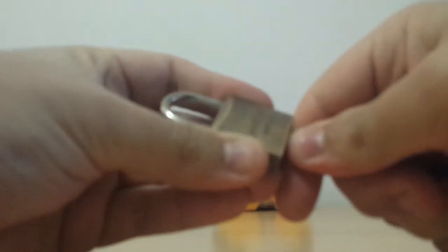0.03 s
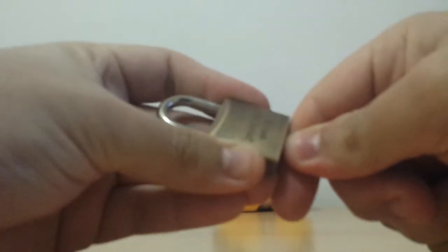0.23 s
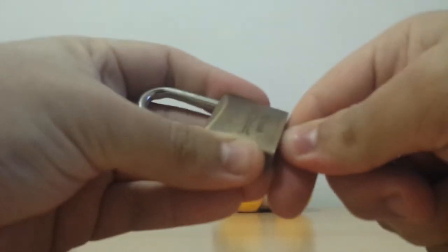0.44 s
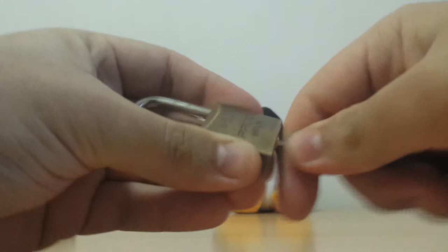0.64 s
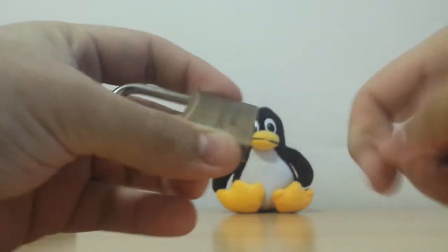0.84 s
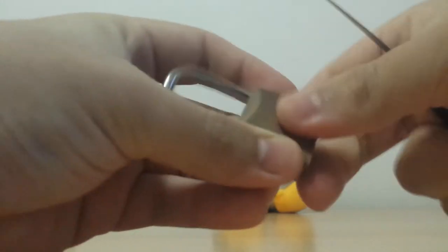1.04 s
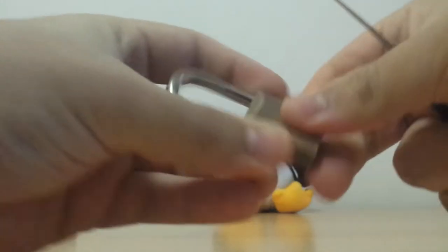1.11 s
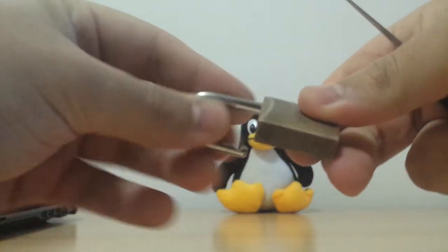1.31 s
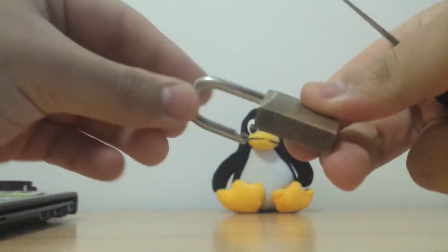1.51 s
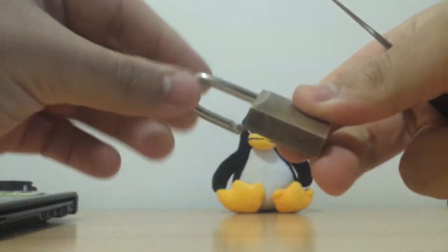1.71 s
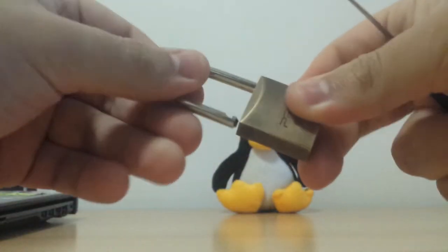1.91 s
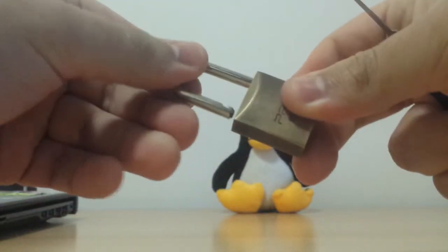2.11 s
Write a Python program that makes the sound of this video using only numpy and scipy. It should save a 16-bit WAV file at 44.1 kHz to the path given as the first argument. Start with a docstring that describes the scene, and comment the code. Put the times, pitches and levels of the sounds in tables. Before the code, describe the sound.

A small metal padlock clicks under a pick, then snaps open with a thin, high ring. Fingers rub softly, and the pick slides out with a quick rattling scrape, heard up close in a quiet room with faint fan noise.

```python
"""A pin clicks over a faint fan hum: a small brass padlock is being picked, close up, in a quiet room.
The sprung shackle snaps against its stop, buzzes in its bore and rings. The pick then rattles over the
pins and scrapes out of the keyway, while fingers rub the lock and the hands take the jolts.
The recorder's gain control ducks at the snap, holds and slowly recovers."""
import sys
import numpy as np
from scipy import signal
from scipy.fft import rfft, irfft, next_fast_len
from scipy.io import wavfile
from scipy.ndimage import uniform_filter1d, minimum_filter1d

SR = 44100
rng = np.random.default_rng(int(sys.argv[2]) if len(sys.argv) > 2 else 0)


def output_pcm(signal):
    """Save a mono or channel-first signal as 16-bit PCM at the path in sys.argv[1].

    Samples are clipped to [-1, 1] before scaling.
    """
    pcm = np.clip(np.atleast_2d(signal).T, -1, 1) * 32767
    wavfile.write(sys.argv[1], SR, np.round(pcm).astype(np.int16))


N = 94815
TIME_S = np.arange(N) / SR
N_FFT = 2 * next_fast_len(N)


def from_db(db):
    """Decibels to gain."""
    return 10 ** (np.asarray(db) / 20)


def unit_rms(x):
    """Scale to unit rms."""
    return x / np.sqrt(np.mean(x ** 2) + 1e-20)


def per_bin(points):
    """Interpolate (frequency, value) points over log frequency at every FFT bin."""
    hz, value = np.transpose(points)
    bins_hz = np.fft.rfftfreq(N_FFT, 1 / SR)
    return np.interp(np.log(bins_hz + 1e-9), np.log(hz), value)


def colour(x, gain_db):
    """Minimum-phase filter with the given gain per bin."""
    cepstrum = irfft(gain_db * np.log(10) / 20)
    size = len(cepstrum)
    cepstrum[1:size // 2] *= 2
    cepstrum[size // 2 + 1:] = 0
    return irfft(rfft(x, size) * np.exp(rfft(cepstrum)))[..., :N]


def delayed(x, lag_s):
    """Delay to the nearest sample."""
    return np.interp(np.arange(N) - np.round(lag_s * SR), np.arange(N), x, left=0)


def decay(start_s, decay_s):
    """Sudden start, exponential fall."""
    return (TIME_S >= start_s) * np.exp(-np.maximum(TIME_S - start_s, 0) / decay_s)


def contact(start_s, decay_s, lumpiness=1):
    """Dying burst of tiny impacts, unit energy; lower lumpiness gives a flatter spectrum."""
    burst = unit_rms(rng.choice([-1, 1], N) * decay(start_s, decay_s)) / np.sqrt(N)
    power = np.abs(rfft(burst, N_FFT)) ** 2
    flattened = colour(burst, -10 * np.log10(power + lumpiness))
    return unit_rms(flattened) / np.sqrt(N)


# Fan air noise (frequency [Hz], relative density [dB])
AIR_SPECTRUM = [(25, -12), (60, -5.5), (100, 1.5), (160, -8.5), (280, -6.5), (400, -9.5), (560, -6.5),
                (780, -3), (1000, -11), (1400, -10.5), (2500, -15.5), (4400, -20.5), (8000, -20.5),
                (14000, -26.5)]
# Air noise between channels (frequency [Hz], likeness before clipping [-])
AIR_LIKENESS = [(60, 0.75), (180, 0.74), (550, 0.15), (1650, -1.5), (4970, -0.0), (15000, 0.11)]
# Fan tones (frequency [Hz], level before trim [dB])
FAN_TONES = [(220.7, -86.5), (285.3, -82), (355.3, -77.5), (489.9, -85.5), (532.9, -78.5), (619.1, -77),
             (710.6, -83.5)]


def fan(air_db=-64, mains_hz=100, mains_db=-75, tone_trim_db=1.5, tone_width_hz=5, left_lag_s=.00023):
    """Soft air noise, mains hum and wavering low tones, off to the right."""
    likeness = np.clip(per_bin(AIR_LIKENESS), 0, .95)
    mid = colour(rng.standard_normal(N), per_bin(AIR_SPECTRUM) + 10 * np.log10(1 + likeness))
    side = colour(rng.standard_normal(N), per_bin(AIR_SPECTRUM) + 10 * np.log10(1 - likeness))
    left, right = from_db(air_db) * unit_rms(np.array([mid + side, mid - side]))
    hum = from_db(mains_db) * unit_rms(np.sin(2 * np.pi * mains_hz * TIME_S))
    radius = np.exp(-np.pi * tone_width_hz / SR)
    for hz, db in FAN_TONES:
        resonator = [1, -2 * radius * np.cos(2 * np.pi * hz / SR), radius ** 2]
        tone = signal.lfilter([1, 0, -1], resonator, rng.standard_normal(N + SR))[SR:]
        hum += from_db(db + tone_trim_db) * unit_rms(tone)
    return np.array([delayed(left + hum, left_lag_s), right + hum])


# Room reverberation (band centre [Hz], T60 [s], relative level [dB])
ROOM_BANDS = [(149.8, .7, 4.5), (600, .6, -3), (2480, 0.38, 4.5), (3900, .42, 1.5), (5860, 0.31, -0.5),
              (7500, .35, 2.5), (9900, 0.31, 0.5), (13170, 0.25, -1)]


def room(x, build_s=.0036):
    """Diffuse tail, different at each microphone port; the treble dies first."""
    white = rfft(rng.standard_normal((2, N)), N_FFT)
    tail = np.zeros((2, N))
    for centre_hz, t60_s, db in ROOM_BANDS:
        passband = per_bin([(hz, float(hz == centre_hz)) for hz, *_ in ROOM_BANDS])
        band = irfft(white * passband)[:, :N]
        tail += from_db(db) * band * decay(0, t60_s / np.log(1000))
    tail *= 1 - np.exp(-(TIME_S / build_s) ** 2)
    return signal.fftconvolve(x[None], unit_rms(tail) / np.sqrt(N), axes=1)[:, :N]


def wall_echo(x, lag_s=.0112, decay_s=.0012):
    """One scattered reflection off the wall behind the desk."""
    return np.array([signal.fftconvolve(x, contact(lag_s, decay_s))[:N] for port in "LR"])


# Grip shifts (centre time [s], half length [s], level [dB])
GRIP_SHIFTS = [(0.29, 0.072, -69), (0.47, 0.16, -59), (1.8, 0.048, -73.5)]
# Skin friction (frequency [Hz], relative level [dB])
SKIN_SPECTRUM = [(40, -6), (80, 3.5), (200, -3), (400, 0.5), (800, -2), (1500, -13.5), (4000, -17),
                 (12000, -27)]


def fingers():
    """Skin rubs softly on the lock."""
    grip = sum(from_db(db) * np.exp(-((TIME_S - at_s) / half_s) ** 2) for at_s, half_s, db in GRIP_SHIFTS)
    return grip * unit_rms(colour(rng.standard_normal(N), per_bin(SKIN_SPECTRUM)))


# Hand jolts (time [s], decay [s], level before pan [dB])
JOLTS = [(0.245, 0.028, -65.5), (0.351, 0.03, -45.5), (0.688, 0.029, -52)]


def hand_thumps(band_hz=(45, 150), width=.7, pan_right_db=4.5):
    """Dull thumps as the hands take each jolt."""
    bandpass = signal.butter(2, band_hz, "band", fs=SR, output="sos")
    mid, side = unit_rms(signal.sosfilt(bandpass, rng.standard_normal((2, N))))
    rumble = np.array([mid + width * side, mid - width * side])
    envelope = sum(from_db(db) * decay(at_s, decay_s) for at_s, decay_s, db in JOLTS)
    return rumble * envelope * from_db([[-pan_right_db], [pan_right_db]])


# Sliding pick resonances (frequency [Hz], relative level [dB])
PICK_SPECTRUM = [(300, -11.5), (1500, -20), (2650, -7.5), (3100, 2), (3500, 9), (4050, -6.5), (4600, 1),
                 (5800, 8.5), (7000, 6), (8100, 6.5), (9200, -3.5), (14000, -7)]


def pick_scrape(start_s=.708, attack_s=.048, end_s=.7893, release_s=.0085, level_db=-39):
    """Uneven slips excite the sliding pick until it leaves the keyway."""
    slips_per_s, spread_db = 2300, 2.5
    sizes = from_db(spread_db * np.minimum(rng.exponential(1, N), 4)) * rng.choice([-1, 1], N)
    slips = (rng.random(N) < slips_per_s / SR) * sizes
    attack = np.clip((TIME_S - start_s) / attack_s, 0, 1)
    release = np.exp(-np.maximum(TIME_S - end_s, 0) / release_s)
    return from_db(level_db) * attack * release * unit_rms(colour(slips, per_bin(PICK_SPECTRUM)))


def ring(start_s, modes):
    """Struck metal: damped modes, neighbours in opposite phase."""
    ringing = np.zeros(N)
    for k, (hz, db, t60_s) in enumerate(modes):
        envelope = from_db(db) * decay(start_s, t60_s / np.log(1000))
        ringing += (-1) ** k * envelope * np.cos(2 * np.pi * hz * (TIME_S - start_s))
    return ringing


# Pick-on-pin touches (time [s], decay [s], gain at each of TOUCH_BANDS_HZ [dB] x 4, ping gain [dB])
TOUCHES = [(0.2054, 0.0016, -10, -3, -4.5, 1, -15.5), (0.2334, 0.0034, -19, -27, -35, -23, -60),
           (0.3404, 0.0018, -18.5, -5, -5, 3.5, -33.5), (0.6555, .0018, -24, -21.5, -19.5, -26.5, -41),
           (0.6600, 0.0012, -34.5, -26.5, -21.5, -21, -41), (0.6635, 0.0016, -20.5, -21, -29, -28, -55),
           (0.6733, 0.00072, -19, -25, -24, -33, -60), (0.6895, 0.0017, -22, -17, -12.5, -14, -51),
           (0.6920, 0.0028, -10.5, -9.5, -2, -8.5, -33), (0.7060, 0.0034, -20, -1.5, -11, -6, -31),
           (0.7168, 0.0017, -20, -22, -6.5, -5, -49), (0.7195, 0.0011, -18, -41, -13, -17, -37),
           (0.7285, 0.0045, -16, -15, -9, -12, -38), (0.7757, 0.0012, -36, -31, -11, -24, -38),
           (0.7787, .001, -42, -29, -15, -20, -40), (0.7866, 0.00072, -49, -24, -11, -18, -50),
           (0.9937, .0007, -36.5, -37, -34.5, -44.5, -57), (1.3585, .002, -48, -43, -30, -46, -62.5),
           (1.396, 0.00068, -49, -46, -49, -37, -77)]
# Bass, mid, treble and top of a touch (frequency [Hz])
TOUCH_BANDS_HZ = [1000, 3000, 6000, 12000]
# Lock body response (frequency [Hz], gain [dB])
BODY_RESPONSE = [(60, -5), (300, -18.5), (750, 1.5), (1100, -8), (2500, 0), (4100, -6), (5600, 3),
                 (8000, -1.5), (10000, -7), (14000, -3.5)]
# Pin dropping in its chamber (frequency [Hz], relative level [dB], T60 [s])
PIN_MODES = [(790, -29.5, 0.044), (2150, -23, .008), (2500, -15, 0.013), (3480, -22.5, .005),
             (5650, -5, .006), (6204, -4, 0.0076), (9000, -14, 0.0036)]


def pin_clicks():
    """Each touch sends a short burst through the lock body and pings the pin."""
    ping = ring(0, PIN_MODES)
    bursts, pings = np.zeros((2, N))
    for at_s, decay_s, *bands_db, ping_db in TOUCHES:
        bursts += colour(contact(at_s, decay_s), per_bin(list(zip(TOUCH_BANDS_HZ, bands_db))))
        pings += from_db(ping_db) * delayed(ping, at_s)
    return colour(bursts, per_bin(BODY_RESPONSE)) + pings


# Shackle and body modes (frequency [Hz], level [dB], T60 [s])
LOCK_MODES = [(120, -42.5, .09), (335, -40.5, .09), (768.4, -35, .07), (1000, -39, .06), (1380, -32.5, .05),
              (1520, -34, .05), (2778, -48.5, .24), (6243, -45.5, .25), (7175, -37, .21), (7520, -40, 0.29),
              (7970, -41.5, .22), (10350, -39.5, .16), (12480, -19, 0.16), (12600, -28, .19),
              (12950, -32, .16), (13610, -30.5, .16), (13620, -32, 0.076)]
SNAP_S = .3507


def lock_ring():
    """Shackle and body ring on after the snap."""
    return ring(SNAP_S, LOCK_MODES)


# Shackle hitting its stop (frequency [Hz], relative level [dB])
CRACK_SPECTRUM = [(60, -19.5), (220, -22), (330, -17), (520, -20), (750, -4), (1000, -8), (1450, 1),
                  (2100, -6), (2900, 2.5), (3900, -9.5), (5000, 10.5), (6200, 14.5), (7500, 13),
                  (8500, 4.5), (11000, 3.5), (13000, 10), (14500, 2.5)]
# Shackle buzzing in its bore (frequency [Hz], relative level [dB])
BUZZ_SPECTRUM = [(300, -32.5), (1000, -16), (4000, -6.5), (5500, 3), (6700, 2), (7400, 10.5), (8500, -1),
                 (11900, -0.5), (12500, 17), (13300, 18), (14400, 2.5)]


def shackle_snap(crack_gain_db=7, buzz_start_s=.3519, buzz_gain_db=8):
    """The sprung shackle hits its stop and buzzes for a few milliseconds."""
    hit = contact(SNAP_S, decay_s=.0009, lumpiness=.25)
    chatter = contact(buzz_start_s, decay_s=.004, lumpiness=.25)
    crack = colour(hit, per_bin(CRACK_SPECTRUM) + crack_gain_db)
    buzz = colour(chatter, per_bin(BUZZ_SPECTRUM) + buzz_gain_db)
    return crack + buzz


# Microphone port mismatch (frequency [Hz], left minus right [dB])
PORT_BALANCE = [(100, -7.5), (700, -8), (3000, -1.5), (4500, 14), (5800, 8.5), (7200, -2), (8600, 1),
                (10500, -14.5), (12500, -7.5), (14000, -9)]


def microphone_ports(direct, reflected, left_lag_s=.00009):
    """The two ports colour the sound differently; direct sound reaches the right one first."""
    half_db = per_bin(PORT_BALANCE) / 2
    left = colour(delayed(direct, left_lag_s) + reflected[0], half_db)
    right = colour(direct + reflected[1], -half_db)
    return np.array([left, right])


def scene(echo_db=-13, picking_send_db=-14, snap_send_db=-8):
    """The lock close up, its wall echo and room tail, the hands and the fan."""
    picking = pin_clicks() + pick_scrape()
    snap = shackle_snap()
    direct = picking + snap + lock_ring() + fingers()
    echo = from_db(echo_db) * wall_echo(snap)
    tail = room(from_db(picking_send_db) * picking + from_db(snap_send_db) * snap)
    return microphone_ports(direct, echo + tail) + hand_thumps() + fan()


def gain_control(x, threshold_db=-15, max_cut_db=6, hold_s=.78, release_db_per_s=18.5, ahead_s=.012):
    """Looks ahead, ducks on a loud peak, holds, then recovers at a steady rate."""
    power = np.abs(uniform_filter1d(np.mean(x ** 2, axis=0), size=130))
    cut_db = np.clip(10 * np.log10(power + 1e-12) - threshold_db, 0, max_cut_db)
    half_hold = int(hold_s * SR) // 2
    held_db = -minimum_filter1d(-cut_db, 2 * half_hold + 1, origin=half_hold, mode="constant")
    ramp_db = release_db_per_s * TIME_S
    released_db = np.maximum.accumulate(held_db + ramp_db) - ramp_db
    smooth_db = uniform_filter1d(released_db, size=130)
    return x * from_db(-delayed(smooth_db, -ahead_s))


def record(dry):
    """Gain control, recorder hiss, rounded peaks and a steep top cut."""
    hiss_db, cutoff_hz = -74.5, 14500
    hiss = from_db(hiss_db) * rng.standard_normal((2, N))
    rounded = np.tanh(gain_control(dry) + hiss)
    lowpass = signal.ellip(10, .2, 70, cutoff_hz, fs=SR, output="sos")
    return signal.sosfilt(lowpass, rounded)


dry = scene()
out = record(dry)
output_pcm(out)
```